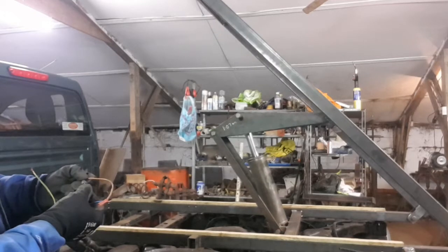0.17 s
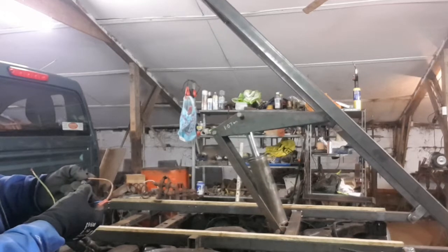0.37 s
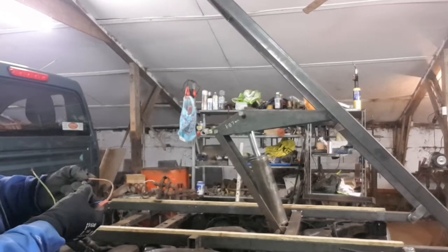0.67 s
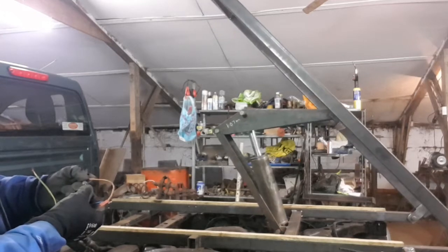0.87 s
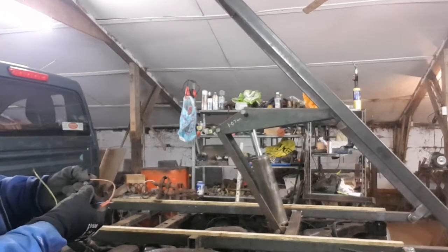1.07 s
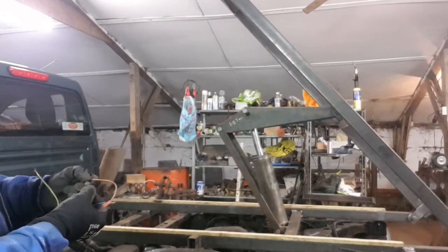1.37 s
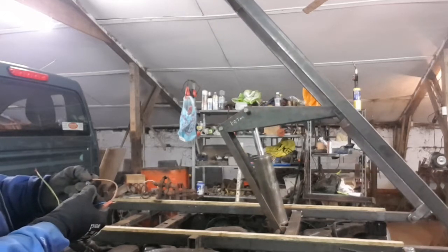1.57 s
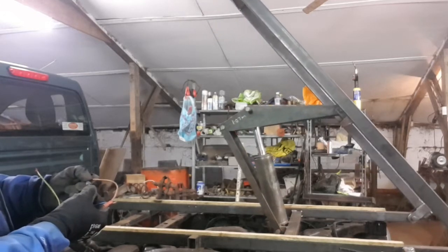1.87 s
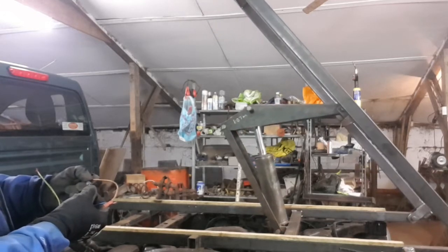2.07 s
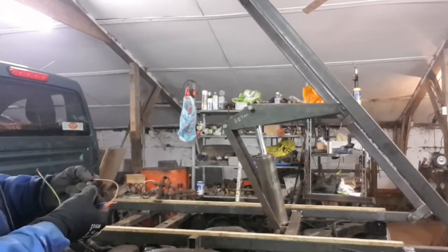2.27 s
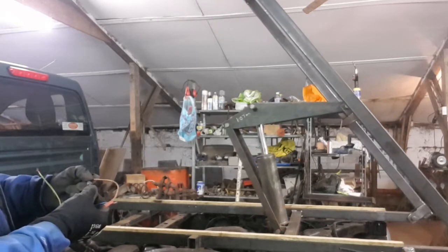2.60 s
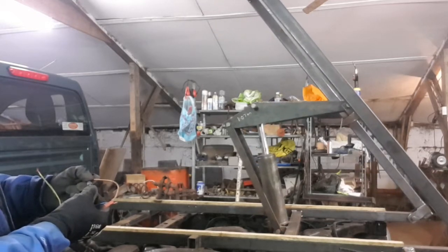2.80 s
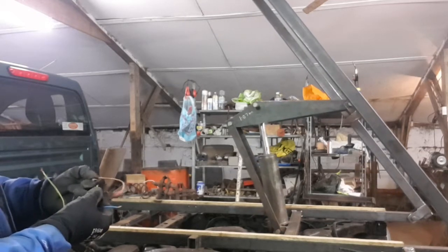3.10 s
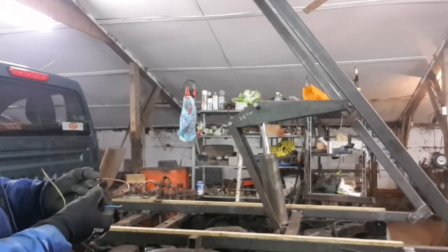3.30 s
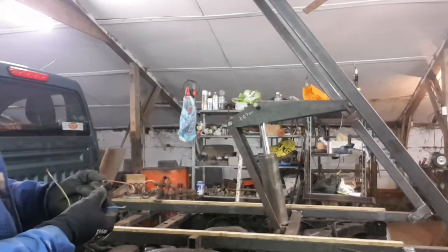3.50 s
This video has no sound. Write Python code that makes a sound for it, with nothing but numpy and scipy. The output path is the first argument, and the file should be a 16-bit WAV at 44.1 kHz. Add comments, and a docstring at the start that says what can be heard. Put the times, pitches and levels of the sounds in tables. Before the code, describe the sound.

An electric hydraulic pump runs from the start, a strong steady whine around 900 Hz with weaker tones, a fast gritty rasp and throbbing hiss. It leans right at first, then grows fuller and more centred after 1.2 s. Low rumble lies underneath until about 1.4 s, with a soft bump at 0.7 s. At 3.1 s a double switch snap and dull clack stop it; the room rings out over a faint low hum.

```python
"""An electric hydraulic pump raises a tipper frame in a workshop, then is switched off at once.
Locked to the motor shaft: a whine at 29 times the turn, weaker tones, a rasp that repeats each turn
and the throb of a hiss. The tones are sines; the rasp is one looped noise pattern; the hiss is noise.
The switch snaps, the pump stops with a clack and the room rings out, all as fading noise.
Filtered noise and a low hum make the rumble and the still air underneath."""
import sys
import numpy as np
from scipy import signal
from scipy.fft import rfft, irfft
from scipy.io import wavfile
from scipy.ndimage import uniform_filter1d

SR = 44100
rng = np.random.default_rng(int(sys.argv[2]) if len(sys.argv) > 2 else 0)


def int16_out(signal):
    """Quantize to a 16-bit WAV file."""
    q = np.round(np.clip(np.atleast_2d(signal).T, -1, 1) * 32767)
    wavfile.write(sys.argv[1], SR, q.astype(np.int16))


N = 160965
TIME = np.arange(N) / SR
OFF_S = 3.104  # motor cut
WHINE_ORDER = 29  # multiple of the shaft speed
PORT_LAG_S = 0.00019  # rasp and hiss reach the right ear this much later

# shaft speed and whine before trim and waver:
# (time [s], speed [turns/s], left level [dB], right level [dB])
SHAFT_RUN = [(0, 31.432, -47, -36.5), (0.3, 31.43, -49, -39.5), (0.62, 31.506, -51.5, -41.5),
             (0.92, 31.4, -47.0, -41.5), (1.05, 31.5, -47, -41), (1.3, 31.63, -42, -39.5),
             (1.7, 31.58, -42.5, -39.5), (2.1, 31.579, -42.5, -39.5), (2.45, 31.63, -40.5, -39),
             (3.05, 31.655, -40.5, -39)]
# motor and gear tones before trim and waver, growth as the frame rises:
# (multiple of the turn, left level [dB], right level [dB], left lead [rad], growth [dB/s])
SHAFT_TONES = [(12, -71, -74, -0.1, 1.5), (13, -60, -65, -0.5, 1.9), (19, -73, -85, 0.8, -3.2),
               (21, -76, -80, -0.2, -1.6), (24, -67, -72, 1.5, 1.5), (25, -70, -81, -2.2, -1.2),
               (26, -59, -68, -1.3, 0.9), (27, -66, -72, -0.8, 0.8), (30, -66, -74, -2.8, 0.4),
               (32, -71, -71, 1.8, -0.1), (47, -70, -75, 0.9, 0.9), (48, -67, -67, 1.1, -0.3),
               (51, -72, -85, 0.6, 1.3), (52, -69, -75, 1.0, 1.8), (58, -57, -58, 1.7, 2.5),
               (78, -78, -82, -1.3, -1.6), (87, -62, -78, 2.2, 0.3), (117, -72, -75, -3.0, 1.6),
               (130, -76, -81, 0.2, 1.8), (161, -76, -78, -0.8, 4.9), (169, -71, -75, 2.7, -1.0),
               (195, -78, -91, -2.0, 1.0), (213, -71, -80, 3.1, 0.1), (221, -77, -79, -0.0, -1.3),
               (377, -77, -83, -0.0, 3.9), (403, -73, -94, -1.5, 2.6), (468, -76, -88, -2.0, 2.9)]
# colour of the pump body before trims:
# (frequency [Hz], rasp level [dB per multiple], hiss level [dB per Hz], left minus right [dB])
PUMP_BODY = [(150, -95, -103, -2.5), (280, -86, -103, -1.5), (450, -85, -95, 7), (655, -81.5, -95, 2),
             (895, -80, -82.5, 1), (1052, -83, -91.5, 6), (1340, -81.5, -100, 3.5),
             (1520, -82.5, -89, -1.5), (1960, -85.5, -99, 1), (2420, -89.5, -105, 5),
             (2690, -85, -103, 11.5), (3280, -90, -105, 3.5), (3760, -84, -104, 3), (3960, -91, -107, -0.5),
             (5150, -84, -103, 8), (6140, -93, -107, 7.5), (6740, -83.5, -103, 5.5), (7430, -89, -107, 8),
             (8300, -103, -116, 1), (9140, -99, -114, 1), (10600, -92, -107, 1.5),
             (13000, -93.5, -103, 7.5), (14000, -88.5, -105, 5), (15200, -89, -103, 10)]


def undb(db):
    """Decibels to gain."""
    return 10 ** (np.asarray(db) / 20)


def curve(table, axis=1):
    """One column of a table, joined by straight lines in time."""
    rows = np.array(table)
    return np.interp(TIME, rows[:, 0], rows[:, axis])


def colour(table, hz, axis=1):
    """One column of a spectrum table, read on a log-frequency axis."""
    rows = np.array(table)
    return np.interp(np.log(np.maximum(hz, 1)), np.log(rows[:, 0]), rows[:, axis])


def pan(db):
    """Left and right gains for a level difference, mean power 1."""
    gains = undb(np.array([[1], [-1]]) * db / 2)
    return gains / np.sqrt(np.mean(gains ** 2, axis=0))


def noise(table, alike=0., axis=1):
    """Stereo noise with a spectrum in dB per Hz; alike is the power share common to both ears."""
    white = rng.standard_normal((3, N))
    share = np.clip(alike, 0, 1)
    both = np.sqrt(1 - share) * white[:2] + np.sqrt(share) * white[2]
    gain = undb(colour(table, np.fft.rfftfreq(N, 1 / SR), axis=axis))
    return irfft(rfft(both) * gain, N) * np.sqrt(SR / 2)


def unit(x):
    """Scale to rms 1."""
    return x / np.sqrt(np.mean(x ** 2))


def walk(rate_hz):
    """Smooth random drift of rms 1 that changes about rate_hz times a second."""
    k = int(SR / rate_hz)
    steps = np.repeat(rng.standard_normal(N // k + 1), k)
    smooth = uniform_filter1d(uniform_filter1d(steps, k), k)
    return unit(smooth[:N])


def fade(start_s, decay_s, rise_s=1e-4):
    """Envelope that rises at start_s and dies exponentially."""
    age = np.maximum(TIME - start_s, 0)
    return (1 - np.exp(-age / rise_s)) * np.exp(-age / decay_s)


def tone(angle, left_db, right_db, lead_rad):
    """A sine that reaches the two ears with its own level and phase."""
    left = undb(left_db) * np.sin(angle + lead_rad)
    right = undb(right_db) * np.sin(angle)
    return np.sqrt(2) * np.array([left, right])


def pump():
    """The motor turns almost evenly, its housing rings; after the cut, high tones leave less echo."""
    wow, flutter = .00012, .0002  # rms share of the shaft speed
    echo_db, treble_echo_db, tone_t60_s = -12, -22, 0.62
    noise_echo_db, noise_t60_s = -5, 0.58
    treble_hz, tail_waver_db = 1300, 3.5

    speed = curve(SHAFT_RUN) * (1 + wow * walk(7.84) + flutter * walk(70))
    turns = np.cumsum(speed) / SR
    tones = whine(turns) + throb(turns)
    rough = ringing(rasp(turns) + hiss(turns), width_hz=55, db=3.2, from_hz=2200)

    low = signal.sosfiltfilt(signal.butter(6, treble_hz, fs=SR, output="sos"), tones)
    treble = tones - low
    tones = low * running(echo_db, tone_t60_s) + treble * running(treble_echo_db, tone_t60_s)
    # the dying tones beat, each ear by itself
    onset = np.clip((TIME - OFF_S) / .04, 0, 1)
    beating = undb(tail_waver_db * np.array([walk(35), walk(35)]) * onset)
    return tones * beating + rough * running(noise_echo_db, noise_t60_s)


def whine(turns):
    """The main whine and the weaker tones, all whole multiples of the shaft speed."""
    whine_db, waver_db, lead_rad = 1.66, 0.65, 1.98  # trim, rms waver, lead of the left ear
    tones_db, tone_waver_db = .5, 1.04  # trim, rms waver
    load_ref_s = 2.0  # growth is 0 dB here
    angle = 2 * np.pi * turns
    main = tone(WHINE_ORDER * angle, curve(SHAFT_RUN, axis=2), curve(SHAFT_RUN, axis=3), lead_rad)
    others = np.zeros((2, N))
    for order, left_db, right_db, tone_lead_rad, growth in SHAFT_TONES:
        start_rad = 2 * np.pi * rng.random()
        level_db = tone_waver_db * walk(7.035) + growth * (TIME - load_ref_s)
        others += tone(order * angle + start_rad, left_db, right_db, tone_lead_rad) * undb(level_db)
    return main * undb(whine_db + waver_db * walk(25.26)) + others * undb(tones_db)


def throb(turns):
    """One shaft-locked tone swells once a turn and weakens as the frame rises."""
    order, start_db, slope_db_per_s = 48, -62.5, -3.5
    swell = np.sin(np.pi * turns) ** 4
    sine = np.sqrt(2) * np.sin(2 * np.pi * order * turns)
    return sine * swell * undb(start_db + slope_db_per_s * TIME)


def rasp(turns, size=8192, count=500):
    """Brushes and gears scrape the same rough pattern on every turn."""
    rasp_db = 1.0  # trim
    order = np.arange(1, count)
    hz = order * np.mean(curve(SHAFT_RUN))
    lag_rad = np.array([[0], [2 * np.pi * PORT_LAG_S]]) * hz
    # common random phase plus a spread between the ears
    phase = 2 * np.pi * rng.random(count - 1) + .8 * rng.standard_normal((2, count - 1)) - lag_rad
    uneven = unit(undb(2.5 * rng.standard_normal((2, count - 1))))
    gain = undb(colour(PUMP_BODY, hz) + rasp_db) * pan(colour(PUMP_BODY, hz, axis=3)) * uneven
    # leave out the multiples that whine() plays
    gain = gain * ~np.isin(order, [WHINE_ORDER] + [row[0] for row in SHAFT_TONES])
    spectrum = np.pad(gain * np.exp(1j * phase), ((0, 0), (1, 0)))
    one_turn = irfft(spectrum, size) * size / np.sqrt(2)
    return np.array([np.interp(turns, np.arange(size) / size, ear, period=1) for ear in one_turn])


def hiss(turns):
    """Oil flow and brush noise in the same body, throbbing with the shaft."""
    hiss_db, pulse_depth = -1.5, 0.26  # trim, share of the amplitude
    hz = np.fft.rfftfreq(N, 1 / SR)
    lag = np.exp(-2j * np.pi * hz * np.array([[0], [PORT_LAG_S]]))
    sides = pan(colour(PUMP_BODY, hz, axis=3)) * lag
    flow = irfft(rfft(noise(PUMP_BODY, alike=0.19, axis=2)) * sides, N)
    return flow * undb(hiss_db) * (1 + pulse_depth * np.sin(2 * np.pi * turns))


def ringing(x, width_hz, db, from_hz):
    """Many narrow resonances and dips, random in gain, colour a sound above from_hz."""
    hz = np.fft.rfftfreq(N, 1 / SR)
    centres_hz = np.arange(0, SR / 2, width_hz)
    gain = unit(np.interp(hz, centres_hz, undb(db * rng.standard_normal(len(centres_hz)))))
    return irfft(rfft(x) * np.where(hz > from_hz, gain, 1), N)


def running(echo_db, t60_s):
    """Full level until the motor is cut; then direct sound dies fast and the room lingers."""
    stop_s = 0.0093  # time constant of the direct sound
    after_s = np.maximum(TIME - OFF_S, 0)
    echo = undb(echo_db)
    return (1 - echo) * np.exp(-after_s / stop_s) + echo * np.exp(-np.log(1000) * after_s / t60_s)


def switch_snaps():
    """Two bright noise snaps of the switch; early echoes and room tail start at the last one."""
    # (time [s], level [dB], decay [s], left minus right [dB])
    snaps = [(3.0918, -40, .0015, -10), (3.0997, -37, .005, 7)]
    # colour of a snap: (frequency [Hz], relative level [dB])
    snap_colour = [(300, -11), (1500, -3), (3000, -4), (5400, -6.5), (6600, 3), (8200, -14.5), (10500, -5),
                   (13500, 0), (16000, -2)]
    early_db, early_s = -5.5, 0.017  # relative to the last snap, decay
    room_db, room_t60_s = -12.5, 0.4  # relative to the last snap

    direct = sum(undb(db) * fade(s, decay_s) * pan(side_db) for s, db, decay_s, side_db in snaps)
    last_s, last_db = snaps[-1][:2]
    early = undb(early_db) * fade(last_s, early_s, rise_s=0.0038)
    room = undb(room_db) * fade(last_s, room_t60_s / np.log(1000), rise_s=0.0054)
    echoes = undb(last_db) * (early + room) * pan(db=5.0)
    return unit(noise(snap_colour, alike=0.25)) * direct + unit(noise(snap_colour)) * echoes


def stop_clack():
    """The duller clack of the stopping pump: coloured noise that dies exponentially."""
    # (frequency [Hz], relative level [dB])
    clack_colour = [(60, -14), (140, -5.5), (260, 2), (340, 0.5), (550, -6), (780, 2), (1120, -1),
                    (1500, -18.5), (2500, -25), (5000, -24), (6800, -21), (8500, -40)]
    clack_s, clack_db, t60_s = 3.103, -44.5, 0.49
    envelope = fade(clack_s, t60_s / np.log(1000), rise_s=0.0053)
    return unit(noise(clack_colour, alike=0.46)) * undb(clack_db) * envelope * pan(db=2.5)


def workshop():
    """Rumble, bump and hum share a slight lean to the left; still air lies under them."""
    # still air: (frequency [Hz], level [dB per Hz])
    air_colour = [(100, -108), (400, -117), (1000, -126), (3000, -135), (9000, -138), (15000, -136)]
    return (rumble() + bump() + hum()) * pan(db=1.3) + noise(air_colour, alike=0.27)


def rumble():
    """Two bands of low noise, each with its own level curve."""
    # (time [s], deep level [dB], upper level [dB])
    rumble_levels = [(0, -52.5, -62), (.35, -50, -67.5), (.6, -57, -71.5), (.66, -47.5, -58),
                     (.83, -52.5, -67.5), (.95, -48, -64.5), (1.4, -47.5, -64.5), (1.42, -64, -79),
                     (1.85, -66, -89), (2.55, -60.5, -79.5), (3.05, -64.5, -78), (3.25, -63.5, -69),
                     (3.42, -62, -84), (3.65, -70.5, -87.5)]
    # colours of the two parts: (frequency [Hz], relative level [dB])
    deep_colour = [(10, -26), (25, -8.5), (42, -6.5), (56, 2.5), (72, -4.5), (100, -14.5), (160, -33.5),
                   (400, -84)]
    upper_colour = [(60, -19), (120, -2.5), (200, -3), (320, -12), (600, -16), (1500, -50)]
    steadiness = .6  # 0 = free swells, 1 = even strength
    deep = noise(deep_colour, alike=0.96)
    swell = np.sqrt(uniform_filter1d(np.mean(deep ** 2, axis=0), size=3000))
    deep = unit(deep / swell ** steadiness) * undb(curve(rumble_levels))
    upper = unit(noise(upper_colour, alike=0.83)) * undb(curve(rumble_levels, axis=2))
    return deep + upper


def bump():
    """One soft bump: a short burst of low noise."""
    # (frequency [Hz], relative level [dB])
    bump_colour = [(60, -5), (160, -3), (520, -4), (900, -22), (3000, -50)]
    bump_s, bump_db, decay_s = .727, -49, 0.026
    return unit(noise(bump_colour, alike=0.77)) * undb(bump_db) * fade(bump_s, decay_s, rise_s=0.0018)


def hum():
    """A steady low sine that swells at the end."""
    # (time [s], level [dB])
    hum_levels = [(0, -71.5), (3.0, -70.5), (3.42, -65.5), (3.5, -57.5), (3.65, -53.5)]
    hum_hz = 53.8
    return np.sqrt(2) * np.sin(2 * np.pi * hum_hz * TIME) * undb(curve(hum_levels))


def scene():
    """The pump and its switch in the workshop."""
    return pump() + switch_snaps() + stop_clack() + workshop()


def record(dry):
    """A steep elliptic low-pass cuts the top."""
    top_hz = 15800
    return signal.sosfilt(signal.ellip(10, .2, 80, top_hz, fs=SR, output="sos"), dry)


dry = scene()
out = record(dry)
int16_out(out)
```